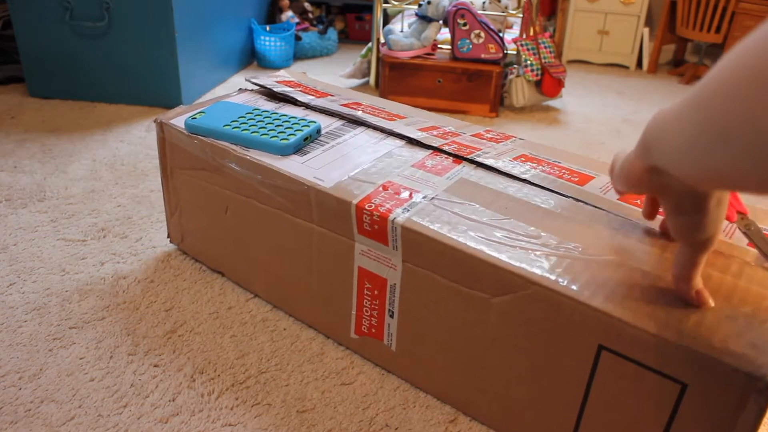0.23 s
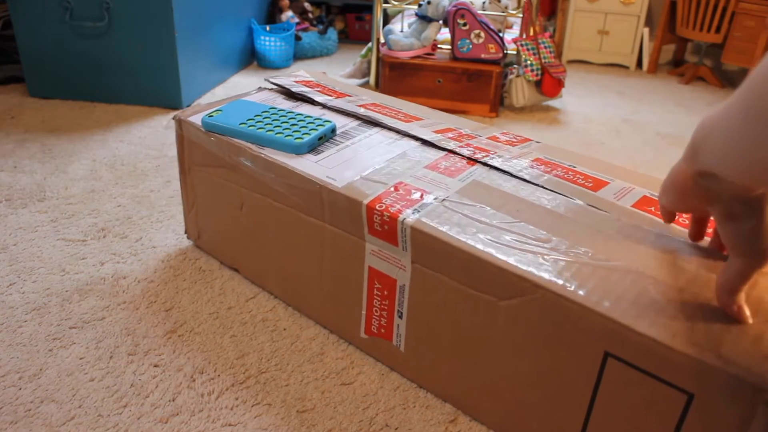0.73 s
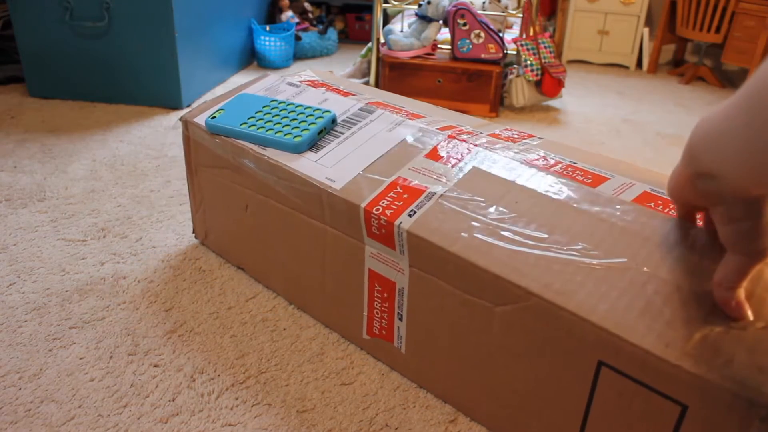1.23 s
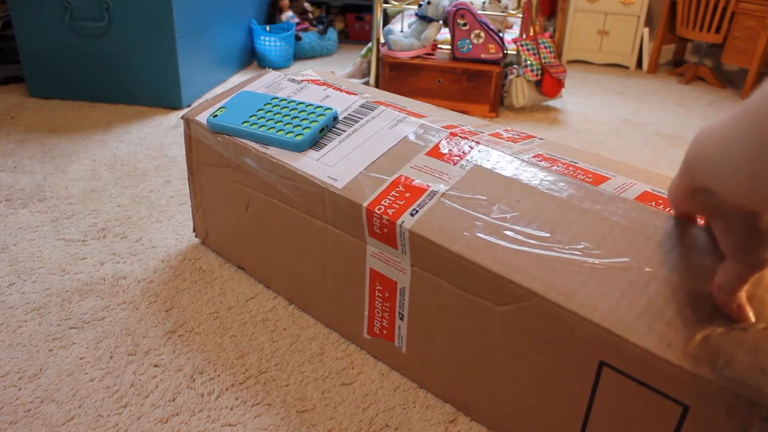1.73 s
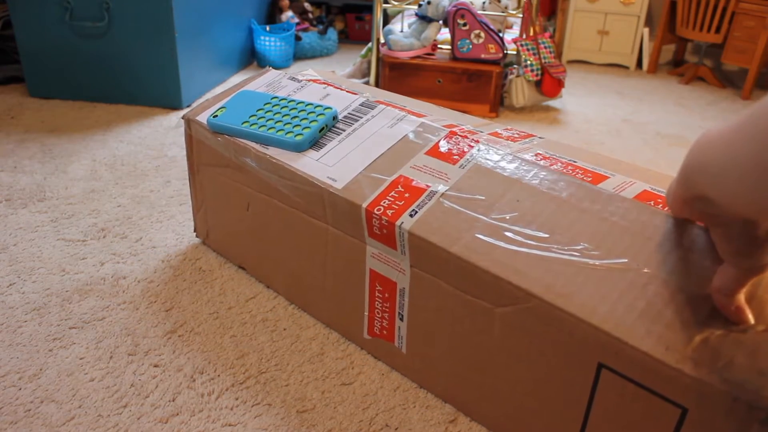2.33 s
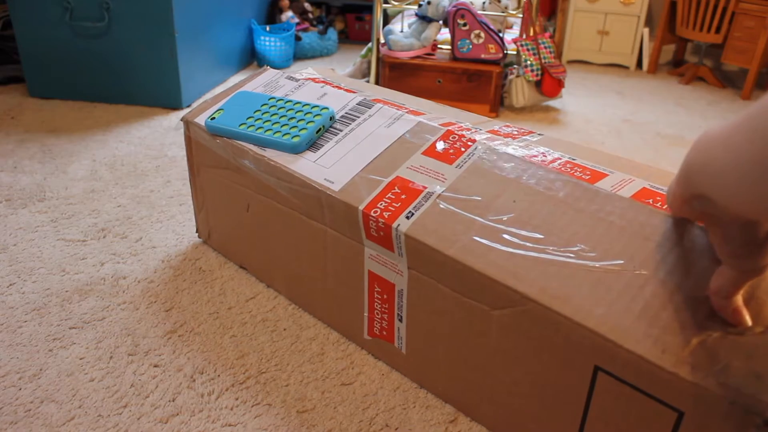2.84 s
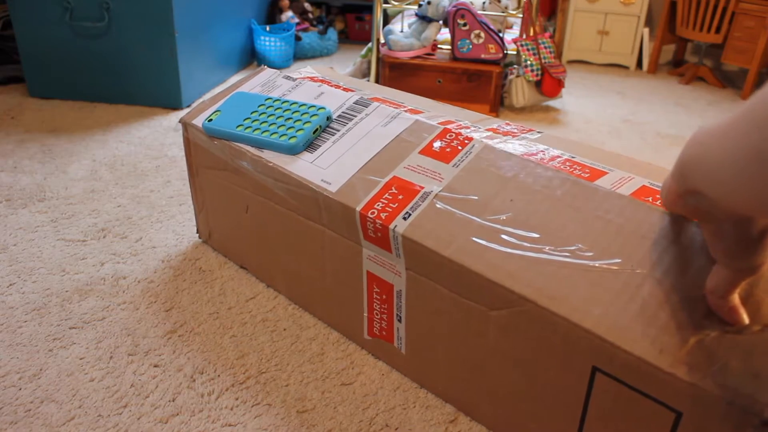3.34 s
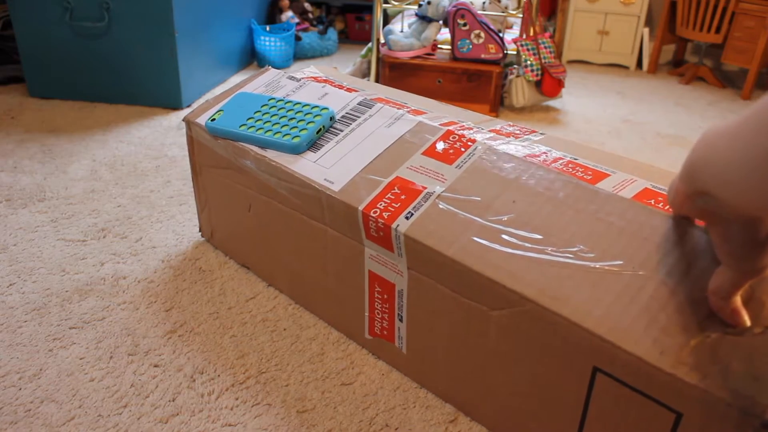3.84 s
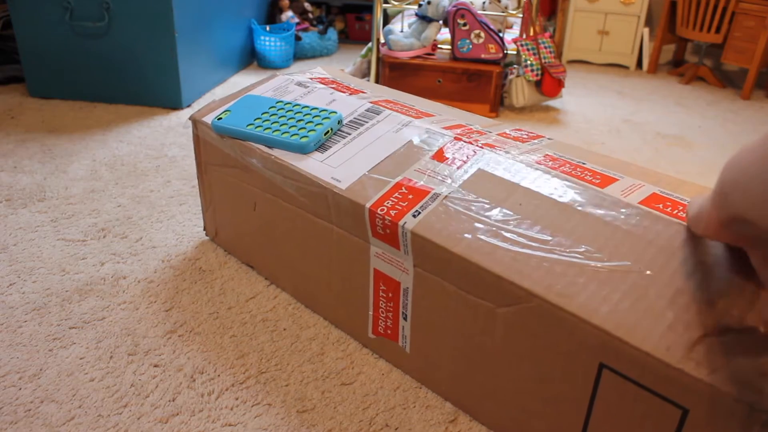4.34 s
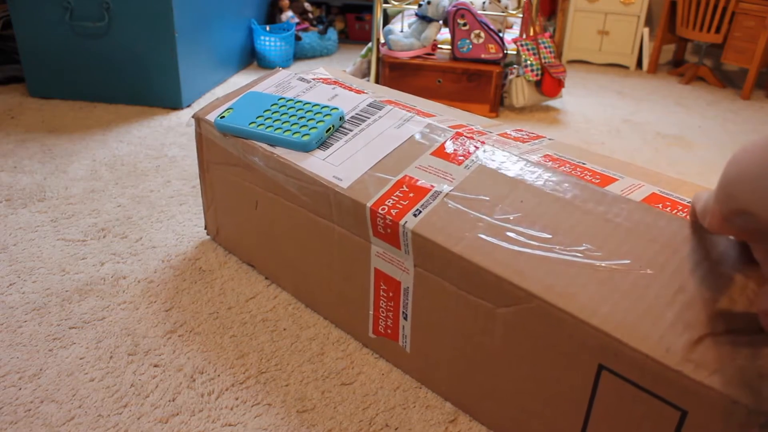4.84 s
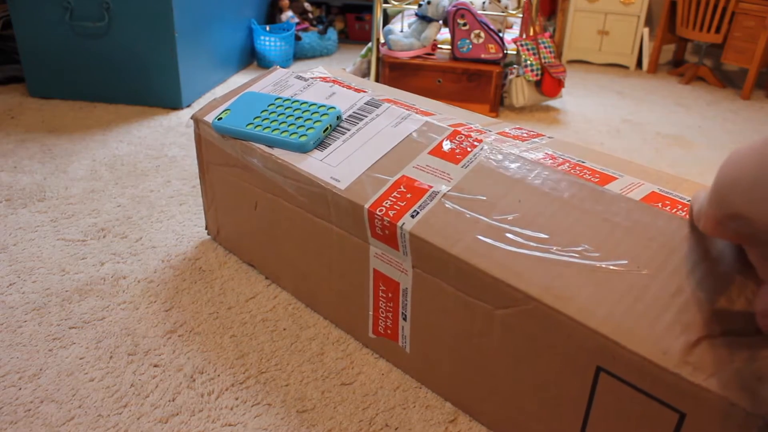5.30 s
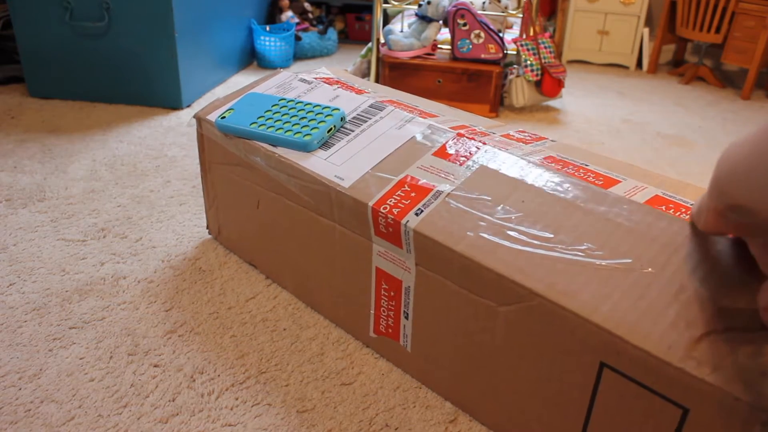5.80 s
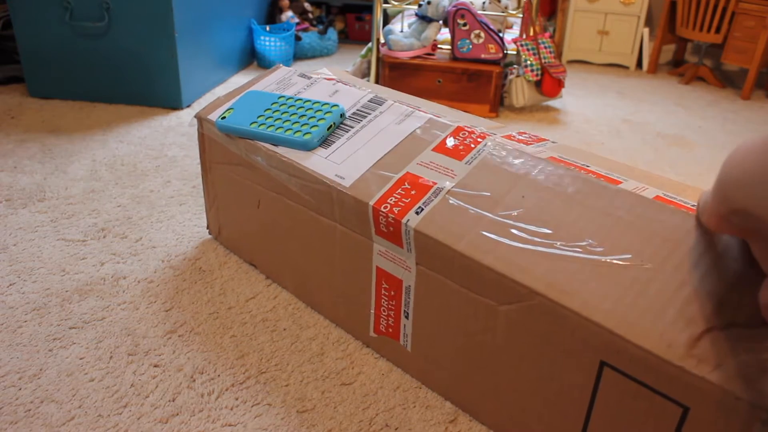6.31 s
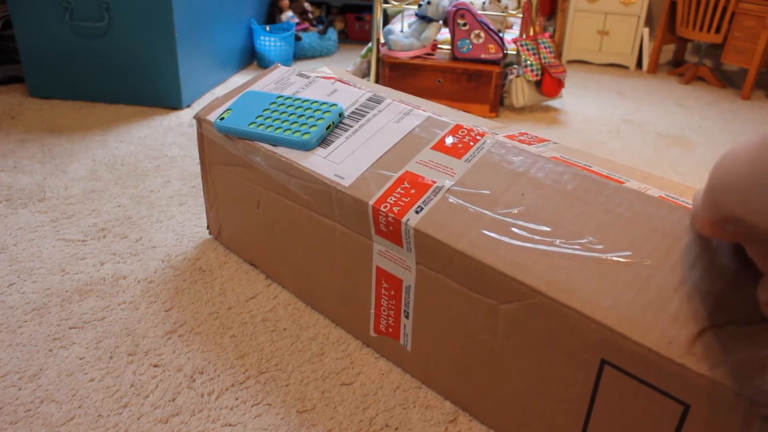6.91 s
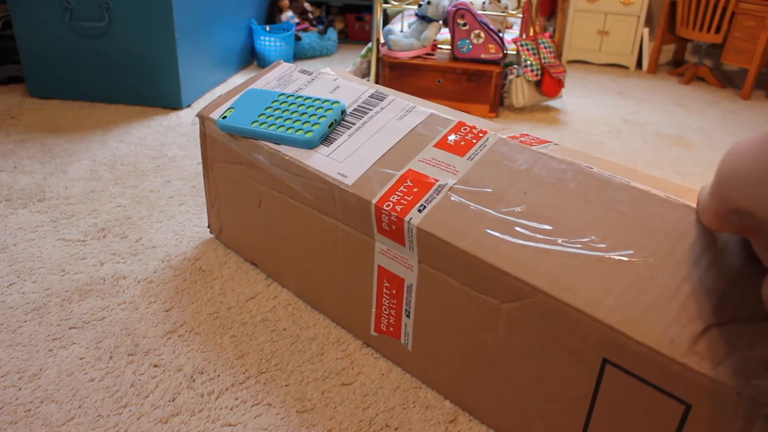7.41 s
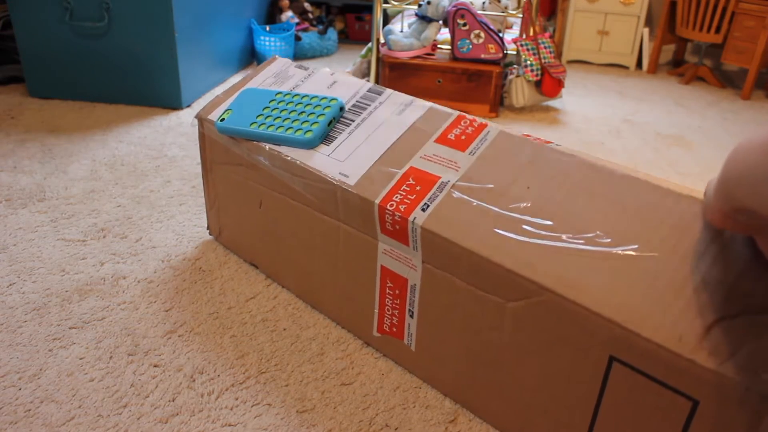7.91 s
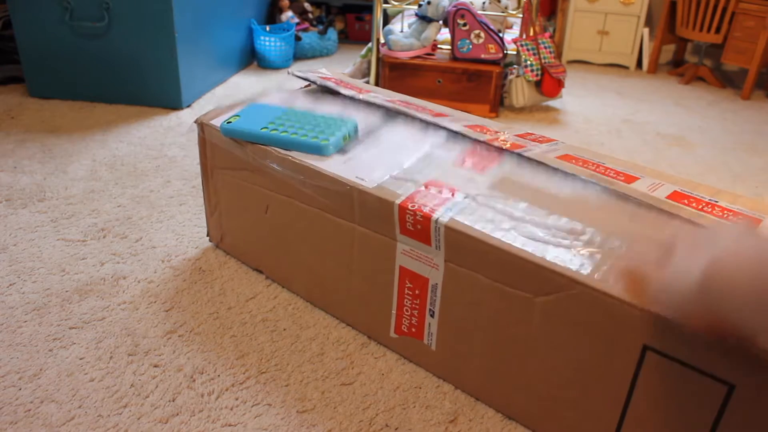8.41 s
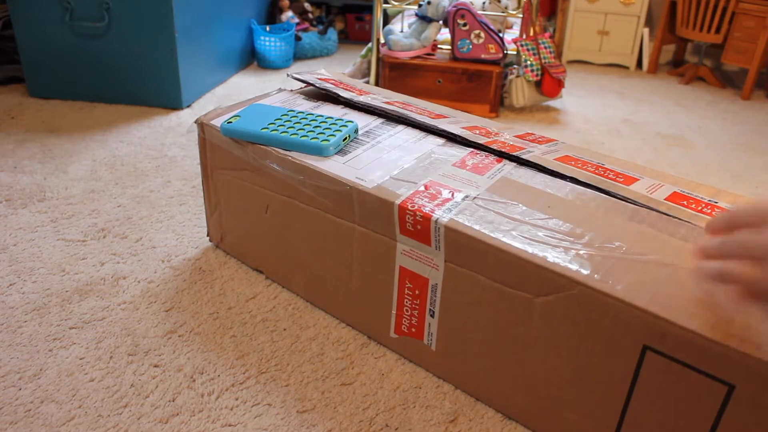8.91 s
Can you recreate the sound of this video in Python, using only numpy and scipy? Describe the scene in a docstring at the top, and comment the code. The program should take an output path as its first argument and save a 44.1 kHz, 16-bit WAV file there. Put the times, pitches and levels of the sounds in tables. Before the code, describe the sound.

Cardboard flaps flex and scrape while packing tape crackles and snaps, with dull hollow box thuds and tiny dry squeaks, close up indoors.

```python
"""A quiet carpeted room: fingers tug at a taped cardboard box, close to the microphone.
Filtered noise and tiny slips, levelled pull by pull, make the flaps flex and scrape and the tape crackle.
Now and then the tape lets go: bursts for tape and paper, with damped modes for the knock on the hollow box.
Short gliding tones make dry squeaks of skin on tape and a faint thin whistle that comes and goes.
Sparse reflections and a low murmur with faint hiss place it all in the room."""
import sys
import numpy as np
from scipy import signal
from scipy.fft import rfft, irfft
from scipy.io import wavfile
from scipy.ndimage import uniform_filter1d

SR = 44100
rng = np.random.default_rng(int(sys.argv[2]) if len(sys.argv) > 2 else 0)


def file_out(sig):
    """Save sig as 16-bit WAV at sys.argv[1]."""
    # one column per channel
    cols = np.atleast_2d(sig).T
    # limit, then scale
    lim = np.clip(cols, -1, 1)
    pcm = np.round(lim * 32767).astype(np.int16)
    wavfile.write(sys.argv[1], SR, pcm)


N = 403515
TIME = np.arange(N) / SR
HZ = np.fft.rfftfreq(N, 1 / SR)

# tape snaps, levels ahead of the mix:
# (time [s], panel knock [dB], paper crack [dB], tape snap [dB], tape snap pitch [Hz])
SNAPS = [(0.0546, -25, -30.5, -40, 6300), (0.2233, -33, -35.5, -20.5, 10700),
         (0.3244, -31.5, -37.5, -38, 7100), (0.3931, -4, -9.5, -29, 3280), (0.401, -15, -30, -16.5, 4630),
         (0.5627, -23.5, -25.5, -33, 6300), (0.6045, -38, -33, -53, 6400),
         (0.6581, -27.5, -38, -35.5, 6560), (0.683, -35, -37, -36, 4320), (0.7601, -29, -33, -22, 6550),
         (0.774, -22.5, -26, -17.5, 4050), (0.8283, -12.5, -18, -28, 9000), (0.8552, -28, -30, -30, 3700),
         (0.9275, -29, -19, -32, 3570), (0.9376, -47, -42, -19, 7400), (0.941, -47, -38, -18, 7150),
         (0.9628, -23.5, -21.5, -25, 4000), (0.9753, -23, -23.5, -53, 3200), (1.109, -35, -35, -31, 6970),
         (1.1189, -41, -37, -28, 5300), (1.4812, -42.5, -39.5, -44, 4470), (1.8136, -66, -37.5, -43, 5000),
         (2.4443, -35, -38, -52, 5300), (3.044, -58, -54, -50, 5000), (3.079, -37, -36, -56, 5330),
         (4.0307, -29, -25, -34, 4300), (4.6183, -34, -38, -43.5, 6300), (4.678, -62, -48.5, -45, 5570),
         (5.3586, -38, -45, -45, 5700), (5.5077, -34.5, -39.5, -44.5, 4200),
         (5.7256, -24.5, -39.5, -41, 4700), (5.8174, -55, -52, -41.5, 9300),
         (5.8576, -30.5, -38, -33, 7250), (5.9932, -47, -36, -34, 5500), (6.0353, -29, -36.5, -30, 7400),
         (6.246, -49, -53, -46, 6000), (6.5923, -41, -37.5, -44, 6700), (6.7044, -39, -46, -27, 5750),
         (7.142, -51, -45, -27.5, 7600), (7.1536, -29.5, -60, -30, 5100), (7.2355, -20, -41, -27.5, 9800),
         (7.2474, -31, -41, -33, 6000), (7.275, -26.5, -27, -23.5, 8550), (7.2941, -27, -50, -32, 10300),
         (7.4026, -67, -46, -35, 9000), (7.5851, -33, -54, -36, 8300), (7.6001, -29.5, -41, -29.5, 8400),
         (7.674, -37, -51, -34, 7800), (7.762, -49, -39, -37.5, 3420), (7.9483, -44, -36, -56, 2900),
         (8.012, -42.5, -45.5, -49, 5000), (8.195, -52, -42, -41, 3680), (8.2353, -24, -27.5, -24, 8050),
         (8.3295, -43, -40, -27, 3380), (8.391, -51.5, -35.5, -31.5, 5200), (8.999, -36, -37, -46, 5700)]


def gain_of(db):
    """Decibels to gain."""
    return 10 ** (np.asarray(db) / 20)


def evened(x):
    """Scales to rms 1."""
    return x / np.sqrt(np.mean(x ** 2) + 1e-20)


def read(points, hz):
    """Reads a table on a log-frequency axis."""
    f, value = np.transpose(points)
    return np.interp(np.log(hz + 1), np.log(f + 1), value)


def add(mix, s, sound):
    """Mixes a sound in at time s."""
    part = mix[max(round(s * SR), 0):][:len(sound)]
    part += sound[:len(part)]


def band(x, lo_hz, hi_hz, order=2):
    """Causal band-pass."""
    edges_hz = [lo_hz, min(hi_hz, .49 * SR)]
    return signal.sosfilt(signal.butter(order, edges_hz, "band", fs=SR, output="sos"), x)


def coloured_noise(gain):
    """Noise of rms 1, coloured by a relative gain at each frequency in HZ."""
    return evened(irfft(rfft(rng.standard_normal(N)) * gain, N))


def wander(rate_hz):
    """Random motion of rms 1, up to about the given rate."""
    return coloured_noise(np.exp(-(HZ / rate_hz) ** 2))


def air():
    """Steady low murmur of the building and faint hiss: noise with the colour of a quiet room."""
    # spectrum of the quiet room: (frequency [Hz], relative level [dB per Hz])
    room_tone = [(30, -19.5), (66, 4), (111, 2), (170, -3), (400, -10.5), (900, -15), (2200, -15.5),
                 (6000, -21), (15500, -25.5)]
    return gain_of(-58.5) * coloured_noise(gain_of(read(room_tone, HZ)))


def room(x, gap_s):
    """Sparse reflections from floor and furniture, each band dying at its own speed."""
    # decay of the room: (frequency [Hz], time to fall by 60 dB [s])
    decay_times = [(120, 0.084), (700, 0.12), (2000, 0.21), (5000, 0.14), (13000, 0.18)]
    n = SR // 2
    arrives = (rng.random(n) < 3000 / SR) * (np.arange(n) > gap_s * SR)  # about 3000 per second
    taps = rng.standard_normal(n) * arrives
    hz, t, z = signal.stft(taps, SR, nperseg=256)
    decay_db = -60 * t / read(decay_times, hz)[:, None]
    tail = signal.istft(z * gain_of(decay_db), SR)[1]
    return signal.oaconvolve(x, tail / np.linalg.norm(tail))[:N]


def glides(rows, rough):
    """Short gliding tones whose pitch trembles by the share rough."""
    out, tremble = np.zeros(N), wander(rate_hz=510)
    for s, length_s, start_hz, end_hz, db in rows:
        n = int(length_s * SR)
        hz = np.linspace(start_hz, end_hz, n) * (1 + rough * tremble[int(s * SR):][:n])
        tone = np.sin(2 * np.pi * np.cumsum(hz) / SR)
        add(out, s, 2 * gain_of(db) * tone * signal.windows.hann(n))
    return out


def whistle():
    """Faint thin tones that swell and fade with only a slight tremble of pitch."""
    # thin whistles: (time [s], length [s], start pitch [Hz], end pitch [Hz], half of the peak [dB])
    whistles = [(1.48, 0.067, 2660, 2650, -65), (2.765, 0.087, 2640, 2670, -60),
                (6.04, 0.28, 2640, 2730, -66), (8.755, 0.07, 3280, 2950, -67)]
    return glides(whistles, rough=0.003)


def squeaks():
    """Dry squeaks of skin on tape: gliding tones with a rough, trembling pitch."""
    # squeaks: (time [s], length [s], start pitch [Hz], end pitch [Hz], half of the peak [dB])
    squeak_glides = [(3.795, 0.035, 3270, 3700, -54.5), (5.5, 0.035, 3800, 3800, -49.5),
                     (5.535, 0.017, 2850, 2480, -50), (5.625, 0.03, 3040, 3500, -44),
                     (6.6, 0.043, 6900, 7700, -51.5)]
    return glides(squeak_glides, rough=0.11)


def effort_db():
    """Levels of panels, flaps and tape: light rubbing, the pulls, and the shudder after each snap."""
    # the hand keeps rubbing lightly between pulls: (time [s], level [dB])
    hand_levels = [(0.0, -47.5), (0.28, -46), (0.84, -52), (1.32, -52.5), (2.88, -53), (3.31, -45),
                   (3.85, -59), (4.05, -44.5), (4.66, -47.5), (5.2, -58), (5.86, -44.5), (6.09, -52.5),
                   (7.36, -56), (7.92, -53.5), (8.33, -36.5), (8.56, -56), (9.05, -61.5), (9.15, -43)]
    # pulls on the flaps, levels ahead of the mix: (time of full force [s], attack [s], hold [s],
    # flexing panels [dB], scraping flaps [dB], crackling tape [dB])
    strokes = [(0.0, .01, 0.11, -44, -42.5, -55), (0.39, 0.11, 0.015, -42, -37, -34),
               (0.562, 0.013, 0.17, -46, -41, -43.5), (0.757, .03, 0.15, -48, -41, -41),
               (0.921, 0.0083, 0.06, -41.5, -36, -30.5), (1.046, .02, 0.0083, -37, -44.5, -45.5),
               (1.103, 0.0021, 0.004, -39, -32, -30.5), (1.23, 0.028, 0.046, -48, -50.5, -58),
               (1.326, 0.023, 0.0069, -46, -43, -42.5), (1.585, .02, 0.036, -49.5, -49.5, -52),
               (1.76, 0.11, 0.024, -38.5, -43, -50.5), (2.024, 0.031, 0.12, -42, -41.5, -52.5),
               (2.189, 0.021, 0.066, -49, -50, -50.5), (2.454, 0.036, 0.047, -33, -36.5, -39.5),
               (2.566, 0.031, 0.029, -46, -40.5, -45.5), (2.671, 0.044, 0.016, -58, -49, -46.5),
               (2.955, 0.026, .015, -44.5, -50, -73), (3.094, 0.041, 0.073, -35.5, -33, -41.5),
               (3.188, .02, 0.031, -43, -44, -46.5), (3.491, 0.12, 0.03, -42, -43, -44),
               (3.595, 0.017, .05, -43, -42.5, -48.5), (3.864, 0.085, 0.25, -46.5, -47, -46.5),
               (4.125, .03, 0.047, -51, -42.5, -43.5), (4.378, .03, 0.086, -55, -49.5, -58),
               (4.55, 0.098, 0.013, -47, -40.5, -68), (4.807, 0.057, 0.021, -32, -38.5, -45),
               (4.937, 0.084, 0.045, -45, -41.5, -52.5), (5.062, 0.015, 0.0096, -48.5, -54.5, -68),
               (5.216, 0.073, 0.036, -40, -42.5, -42.5), (5.353, 0.0083, 0.09, -48.5, -48, -49),
               (5.509, .012, 0.095, -51, -47.5, -49), (5.627, 0.036, 0.093, -40, -42.5, -42.5),
               (5.729, .008, 0.025, -30.5, -29.5, -40), (5.843, 0.013, 0.013, -32.5, -39.5, -40),
               (5.973, 0.01, 0.073, -38, -40.5, -38), (6.25, 0.007, 0.059, -44.5, -40, -45),
               (6.359, 0.08, 0.016, -42.5, -44.5, -48.5), (6.433, 0.033, 0.033, -54, -47.5, -53.5),
               (6.699, 0.1, 0.018, -46, -40.5, -35.5), (6.791, 0.018, .045, -48, -40, -46),
               (6.876, .03, 0.054, -50, -50, -51), (6.959, 0.033, 0.025, -40.5, -36.5, -45.5),
               (7.1, 0.06, 0.066, -51, -40, -38), (7.137, .004, 0.011, -37, -47, -32.5),
               (7.203, 0.018, 0.042, -32, -34.5, -38), (7.262, 0.018, 0.005, -44, -26.5, -27),
               (7.45, .05, 0.058, -48, -39, -39.5), (7.594, 0.038, 0.043, -38, -42.5, -39.5),
               (7.665, 0.017, 0.031, -33.5, -35.5, -36), (7.91, 0.033, 0.068, -51, -51, -51.5),
               (8.121, 0.11, .015, -42.5, -45.5, -48), (8.212, 0.039, 0.058, -47, -44.5, -48),
               (8.351, 0.032, 0.017, -36, -36.5, -43), (8.432, .02, 0.044, -44, -42.5, -40.5),
               (9.001, 0.0065, 0.025, -43, -38, -43.5), (9.115, 0.069, 0.037, -40, -45.5, -49.5)]
    step = 64  # samples
    t = TIME[::step]
    waver_db = 2.5 * wander(rate_hz=36)[::step]  # unsteadiness of the hand
    rubbing_db = np.interp(t, *np.transpose(hand_levels)) + waver_db
    share_db = np.c_[[-10.5, -8, -7]]  # panels, flaps and tape
    power = gain_of(rubbing_db + share_db) ** 2

    # a pull builds up, tires a little while it is held, and lets go;
    # panels, flaps and tape come to rest at their own speeds
    attack_range_db, sag_db_per_s, release_db_per_s = 26.5, 19.5, (361, 325.5, 286.5)
    for s, attack_s, hold_s, *levels_db in strokes:
        rise_db = attack_range_db * np.minimum(t - s, 0) / attack_s
        sag_db = sag_db_per_s * np.clip(t - s, 0, hold_s)
        release_db = np.outer(release_db_per_s, np.maximum(t - s - hold_s, 0))
        power += gain_of(np.c_[levels_db] + rise_db - (sag_db + release_db)) ** 2

    # after a snap the box shudders on: panels, flaps and tape, relative to knock, crack and snap
    shudder_db, shudder_db_per_s = (-17, -6, -22.5), 332.5
    for s, *levels_db, _ in SNAPS:
        start_db = np.c_[np.add(levels_db, shudder_db)]
        power += (t > s) * gain_of(start_db - shudder_db_per_s * abs(t - s)) ** 2
    return [np.interp(TIME, t, 10 * np.log10(p)) for p in power]


def through_box(x, order=4096):
    """Causal filter with the colour and the resonances of the cardboard."""
    # colour of rubbed cardboard and tape: (frequency [Hz], relative level [dB per Hz])
    cardboard = [(40, -48), (70, -17.5), (105, 0), (160, -1.5), (250, 3), (420, -10), (600, -2.5),
                 (850, -9.5), (1300, -9.5), (1900, -14), (3300, -20), (7000, -22.5), (11500, -26),
                 (16000, -31)]
    # resonances of the box: (frequency [Hz], width [Hz], peak [dB])
    resonances = [(120, 21, 0.5), (280, 50, -5), (440, 140, 7), (552, 44, 4.5), (734, 56, 2),
                  (998, 75, 3.5), (1420, 60, -1), (1720, 310, 3), (1870, 60, 1), (2400, 85, 1)]
    hz = abs(np.fft.fftfreq(order, 1 / SR))
    db = read(cardboard, hz)
    db = db + sum(peak_db / (1 + (2 * (hz - f) / width) ** 2) for f, width, peak_db in resonances)
    minimum_phase = np.exp(np.conj(signal.hilbert(np.log(gain_of(db)))))
    response = np.fft.ifft(minimum_phase).real
    return signal.oaconvolve(x, response[:order // 2])[:N]


def shifting(x, patchy_db, order=512):
    """The contact point moves, so that the colour changes in patches."""
    z = signal.stft(x, nperseg=order)[2]
    across_pitch = uniform_filter1d(rng.standard_normal(z.shape), size=7, axis=0)
    patches = uniform_filter1d(across_pitch, size=6, axis=1)
    return signal.istft(z * gain_of(patchy_db * evened(patches)), nperseg=order)[1][:N]


def slips(per_s, spread_db, smooth):
    """Tiny slips of very unequal size, over a share of smooth friction."""
    size = gain_of(spread_db * np.minimum(rng.exponential(1, N), 4))
    clicks = size * rng.choice([-1, 1], N) * (rng.random(N) < per_s / SR)
    return evened(clicks) + smooth * rng.standard_normal(N)


def at_level(x, level_db, span_s):
    """Gives a texture its level and keeps the grain that is faster than span_s."""
    window = signal.windows.hann(max(int(span_s * SR), 3))
    power = signal.oaconvolve(x ** 2, window / window.sum(), "same")
    return x / np.sqrt(abs(power) + 1e-6 * np.mean(x ** 2)) * gain_of(level_db)


def tugging(flex_db, scrape_db, crackle_db):
    """Stick and slip drive the panels, the flap edges and the tape together."""
    flex_top_hz, scrape_top_hz = 336, 2426
    grip = wander(rate_hz=38)  # the grip catches and gives many times in each stroke
    fibres = slips(per_s=1500, spread_db=3.0, smooth=0.82) * gain_of(2.64 * grip)
    glue = slips(per_s=4200, spread_db=3.0, smooth=0.56) * gain_of(2.0 * grip)
    rubbed_box = through_box(fibres)
    peeled_tape = through_box(glue + 0.16 * fibres)
    flex = band(rubbed_box, 50, flex_top_hz, order=3)
    scrape = shifting(band(rubbed_box, flex_top_hz, scrape_top_hz, order=4), patchy_db=2.5)
    crackle = shifting(band(peeled_tape, scrape_top_hz, 19000, order=4), patchy_db=2.5)
    flex = at_level(flex, flex_db, span_s=.04)
    scrape = at_level(scrape, scrape_db, span_s=0.059)
    crackle = at_level(crackle, crackle_db, span_s=0.053)
    return flex + scrape + crackle


def ticks(tape_db):
    """Single spots of glue let go at random, louder under strain; most are small, a few stand out."""
    size_db = 3 * np.minimum(rng.exponential(1, N), 2.5)
    clicks = (rng.random(N) < 30 / SR) * gain_of(tape_db + size_db)  # about 30 per second
    bright = gain_of(23) * band(clicks, 3100, 9500)
    papery = gain_of(26) * band(clicks, 550, 1800)
    return bright + papery


def releases():
    """Snaps and thuds, each as (s, panel Hz, knock dB, crack dB, snap dB, snap Hz)."""
    # dull thuds of a buckling panel, levels ahead of the mix:
    # (time [s], panel pitch [Hz], knock level [dB])
    thuds = [(0.6207, 268, -25), (1.497, 150, -34.5), (2.9557, 407, -30), (3.091, 370, -32),
             (3.135, 268, -31), (3.2905, 310, -34), (3.5216, 205, -24.5), (4.1689, 388, -32.5),
             (4.839, 220, -32), (5.2426, 138, -31.5), (5.741, 246, -21.5), (5.7606, 345, -27),
             (5.9755, 248, -24), (6.256, 278, -31.5), (6.963, 256, -26.5), (7.082, 247, -27.5),
             (8.363, 193, -26), (9.132, 125, -39)]
    # the more crack a snap has over its knock, the smaller and higher the patch of panel that it kicks
    patch_hz, patch_db_per_octave, patch_top_hz = 488, 29.5, 493
    for s, knock_db, crack_db, snap_db, snap_hz in SNAPS:
        octaves = (crack_db - knock_db) / patch_db_per_octave
        hz = min(patch_hz * 2 ** octaves, patch_top_hz)
        yield s, hz, knock_db, crack_db, snap_db, snap_hz
    for s, hz, db in thuds:
        yield s, hz, db, db - 20.5, db - 31, 5000  # paper and tape barely sound in a thud


def burst(t, lo_hz, hi_hz, decay_s, scatter):
    """One sharp release, followed by a quickly dying scatter of smaller ones."""
    after = rng.standard_normal(len(t)) * np.exp(-t / decay_s)
    return band((t == 0) + scatter * after / np.linalg.norm(after), lo_hz, hi_hz)


def kicked_panel(t, hz, knock_db):
    """A few heavily damped modes; a harder kick sounds brighter, with more of the higher modes."""
    # modes of a kicked panel: (multiple of its pitch, level before the kick's tilt [dB],
    # time to fall to 1/e [cycles])
    panel_modes = [(.55, -15, 1.4), (1, 10, 0.54), (1.8, -3.5, 1.27)]
    bright_db = 0.78 * (knock_db + 22.5)  # per octave
    panel = np.zeros(len(t))
    for ratio, db, cycles in panel_modes:
        ring = np.sin(2 * np.pi * ratio * hz * t) * np.exp(-t * ratio * hz / cycles)
        panel += gain_of(db + bright_db * np.log2(ratio)) * ring
    return band(panel, 0.55 * hz, 4 * hz)  # a small panel radiates no deep bass


def snaps():
    """Each release cracks the tape and paper and kicks a heavily damped panel."""
    out, t = np.zeros(N), np.arange(SR // 16) / SR
    span = np.sqrt(.005 * SR)  # levels are rms over 5 ms
    for s, hz, knock_db, crack_db, snap_db, snap_hz in releases():
        panel = kicked_panel(t, hz, knock_db)
        crack = burst(t, 680, 2720, decay_s=0.0016, scatter=1.6)
        # tauter tape snaps higher
        snap = burst(t, snap_hz / 1.77, snap_hz * 1.61, decay_s=0.0013, scatter=1.4)
        parts = (panel, knock_db), (crack, crack_db), (snap, snap_db)
        add(out, s, span * sum(gain_of(db) * part / np.linalg.norm(part) for part, db in parts))
    return out


def scene():
    """The box close by, and the room around it."""
    flex_db, scrape_db, crackle_db = effort_db()
    rubbing = gain_of(-1.19) * tugging(flex_db, scrape_db, crackle_db) + squeaks()
    blows = gain_of(-0.56) * snaps() + ticks(crackle_db)
    echo = room(gain_of(-12.5) * rubbing + gain_of(-8.5) * blows, gap_s=.004)
    return (rubbing + blows + echo + whistle() + air())[None]


def record(dry):
    """The microphone signal clips at full scale; then a low-pass at 16 kHz limits the band."""
    low_pass = signal.firwin(301, 16000, window=("kaiser", 8), fs=SR)
    return signal.oaconvolve(np.clip(dry, -1, 1), low_pass[None], "same")


dry = scene()
out = record(dry)
file_out(out)
```